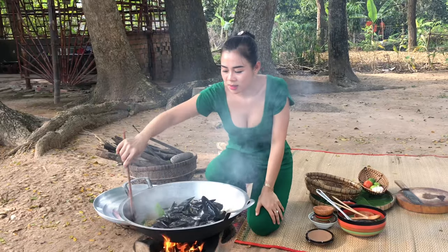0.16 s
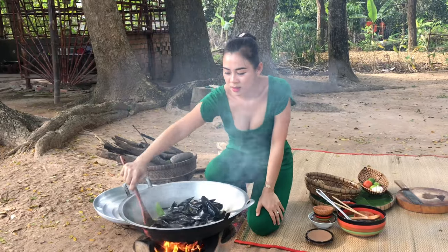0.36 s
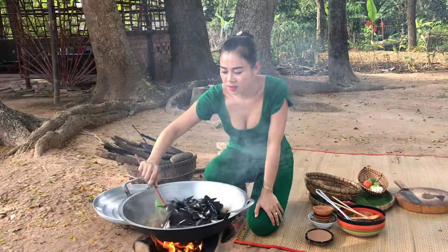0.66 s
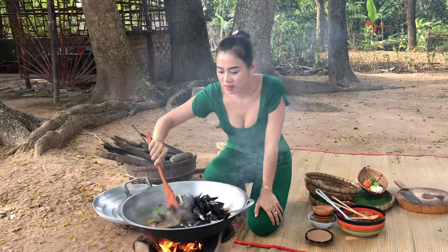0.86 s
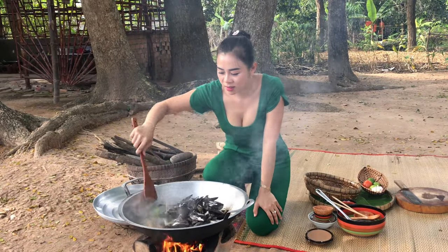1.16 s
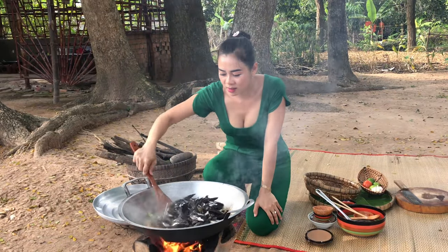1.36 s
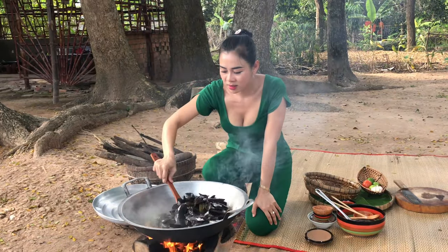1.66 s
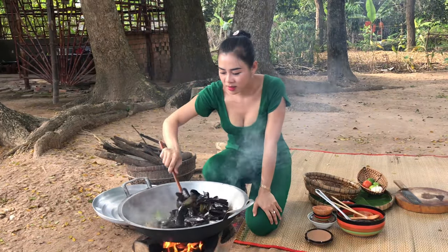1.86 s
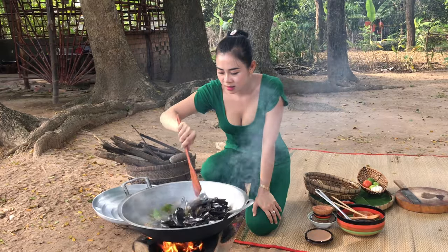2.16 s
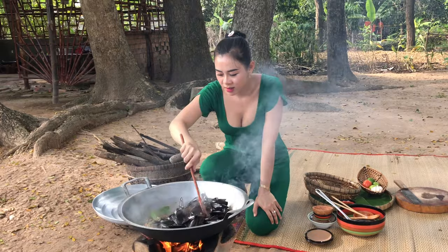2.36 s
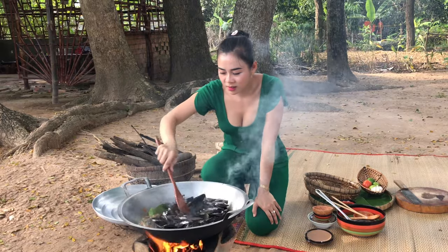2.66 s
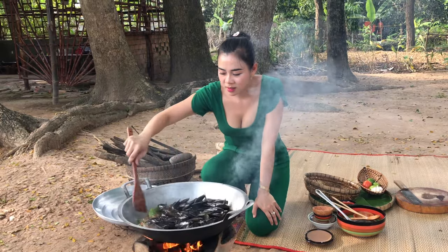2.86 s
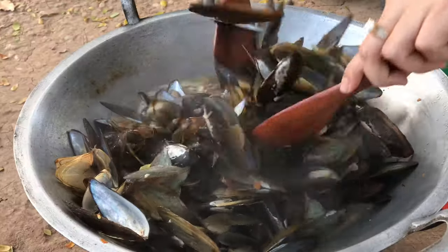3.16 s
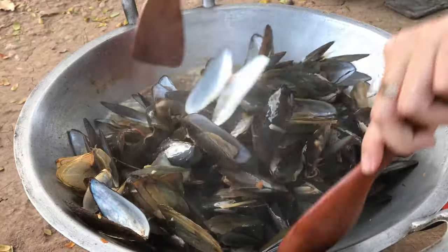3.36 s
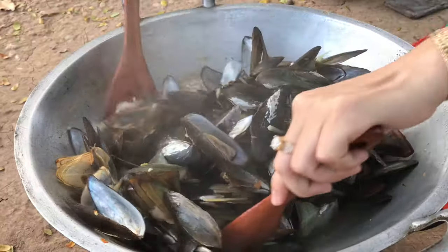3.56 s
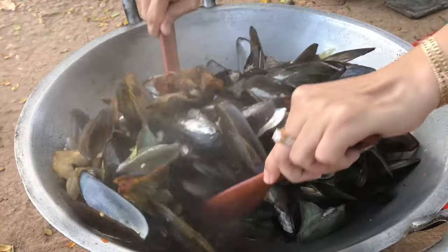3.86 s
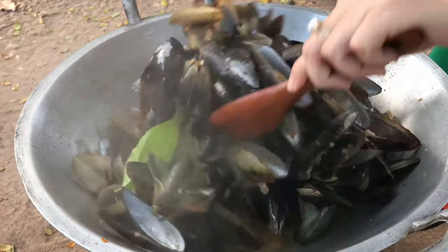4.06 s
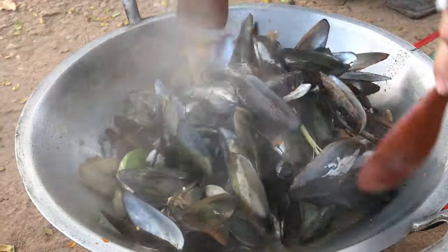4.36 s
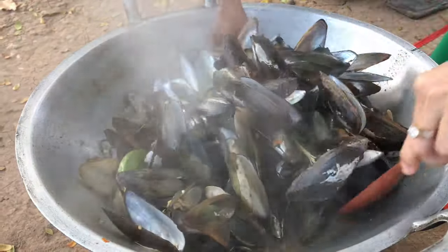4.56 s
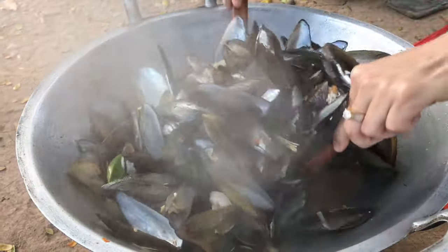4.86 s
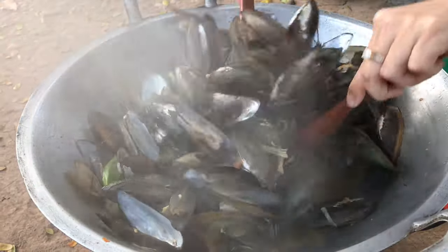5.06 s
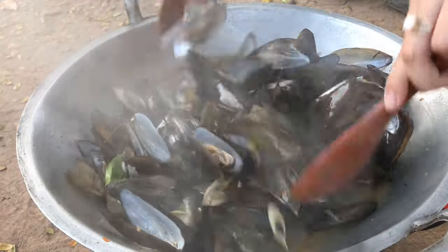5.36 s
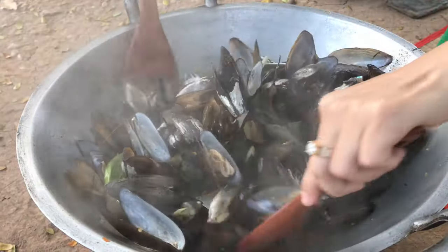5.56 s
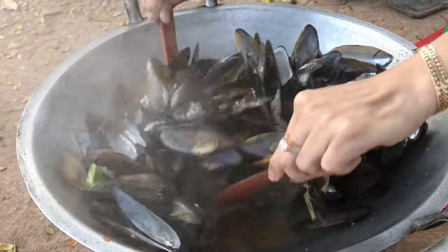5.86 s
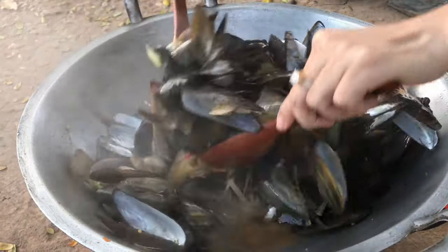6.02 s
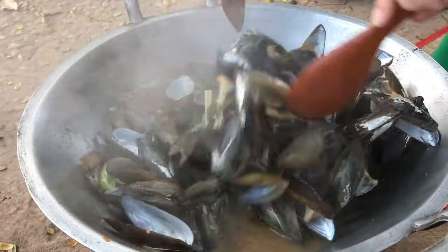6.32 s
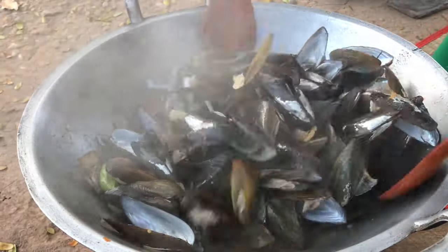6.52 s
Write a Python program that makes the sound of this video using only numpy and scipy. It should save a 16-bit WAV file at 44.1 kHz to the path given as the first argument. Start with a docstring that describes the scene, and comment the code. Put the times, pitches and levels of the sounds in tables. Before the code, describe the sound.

From 0 to 3 seconds the wok is some steps away outdoors and everything is quiet: a low wavering engine drone with soft airy hiss and a thin simmering hum, faint shell grinding in slow strokes, small clacks and light metallic knocks at about 0.25 and 1.3 s. At 3.0 s sound drops out for a few hundredths of a second, then returns far louder, right at the microphone. Mussel shells clatter crisply at 3.1-3.5 s, with wok knocks. Spatula pushes follow two or three a second, scraping shells, sloshing thick bubbly broth and raising bright fizz. Wet thuds land around 3.6-4.1 and 5.1-5.8 s; sharp clacks stand out near 4.5 and 4.9 s, then a dense tumble at 5.2-5.7 s. From 6 to 6.7 s the clacks are strongest, ending with a bright wok knock at 6.6 s. Engine hum and low rumble continue behind.

```python
"""Shells clack and grind, faint at first: mussels turned with wooden spatulas in a wok of broth, outdoors.
For three seconds the wok is some steps away; after a brief silence it is right at the microphone.
Shells and metal are dying modes; scrapes, sloshing broth and fizz are crowds of tiny grains.
Knocks ring the wok, wet thuds sound in the heap, and behind them an engine drones as wavering tones."""
import sys
import numpy as np
from scipy import signal
from scipy.fft import rfft, irfft
from scipy.io import wavfile
from scipy.ndimage import uniform_filter1d

SR = 44100
rng = np.random.default_rng(int(sys.argv[2]) if len(sys.argv) > 2 else 0)


def generate_wav(sig):
    """Save sig (samples, or channels by samples) to the path in sys.argv[1] as 16-bit PCM at SR."""
    pcm = np.round(np.clip(np.atleast_2d(sig).T, -1, 1) * 32767).astype(np.int16)
    wavfile.write(sys.argv[1], SR, pcm)


N = 295029
TIME = np.arange(N) / SR

CUT_OUT, CUT_IN = 3.014, 3.048  # s, the silent gap between the distant and the close position
REST_GRIND_DB, REST_SLOSH_DB, REST_FIZZ_DB = -45.5, -44.5, -53.5  # close up, between pushes

# the wok's ringing modes: mode_hz, level_db, t60_s
WOK = [(353, -7.5, 0.12), (468, -17, 0.18), (700.5, -8.5, 0.11), (798, -10, 0.27), (920, -26, 0.065),
       (1070, -3, 0.11), (1270, -0.5, 0.094), (1360, -6, 0.14), (1670, -23, 0.21), (1740, 0, 0.1),
       (1890, 4, 0.043), (2086, 5, 0.053), (2387, 2, 0.097), (2513, 2.5, 0.099), (2600, 4.5, 0.1),
       (2810, 8.5, 0.076), (3080, 5, 0.064), (3470, -14, 0.073), (4030, 8.5, 0.027), (4290, 1, 0.074),
       (4320, -30, 0.091), (5690, 2, .07), (6600, -11, .04)]
# colour of shells grinding, also of the crack of a knock: frequency_hz, density_db (per Hz)
GRIND = [(400, -31.5), (900, -6), (1500, -6.5), (2400, 0), (3300, -0.5), (4500, -4.5), (5200, -10.5),
         (6300, -5), (9000, -16), (16000, -24)]


def clacks(rows, second_db=-4, side_db=-5.0, side_octaves=0.58, edge_t60=0.015, edge_db=-1.5, ring_share=0.64):
    """Each shell rings in two strong modes among a crowd of weak ones; its hard edge adds a bright tick."""
    # a shell's bright tick: frequency_hz, density_db (per Hz)
    edge_colour = [(3000, -38), (6000, 3.5), (8200, 7), (10200, -1), (12000, 2), (15500, -3)]
    second_ratio, second_octaves = 1.603, 0.15  # second mode over the first, and its scatter
    out, t = np.zeros(N), np.arange(1800) / SR
    hz = np.fft.rfftfreq(len(t), 1 / SR) + 1
    contact = 1 - np.exp(-t / .0004)  # the wet contact lasts a moment
    for s, db, main_hz, sharp_db, t60 in rows:
        second_hz = main_hz * second_ratio * 2 ** (second_octaves * rng.standard_normal())
        phases = np.exp(2j * np.pi * rng.random((2, len(hz))))
        octaves_away = np.log2(hz / main_hz)
        crowd = irfft(phases[0] * np.exp(-.5 * (octaves_away / side_octaves) ** 2))
        crowd = struck(crowd * amp(-60 * t / t60))
        modes = struck(ring([main_hz, second_hz], [0, second_db], t60 * ring_share, t))
        body = (modes + amp(side_db) * crowd) * contact
        snap = amp(-60 * t / edge_t60) + amp(-0.5 - 60 * t / 0.0023)  # a short sizzle and a sharper snap
        edge = irfft(phases[1] * amp(read(edge_colour, hz))) * snap
        add(out, s, amp(db) * (struck(body) + amp(sharp_db + edge_db) * struck(edge)))
    return out


def loose_shells(grind):
    """Small clacks at random moments, as strong as the push that tumbles them; rows for clacks()."""
    per_s, over_grind_db, spread_db = 42, 2.5, 2
    centre_hz, octaves, edge_db, t60_s = 3004, 0.422, -6.5, .015
    count = int(per_s * N / SR)
    chance = rng.random((400, 4))[:count]
    at = (chance[:, 0] * N).astype(int)
    size, pitch, edge = np.sqrt(12) * (chance[:, 1:].T - .5)  # uniform, rms 1
    db = 20 * np.log10(grind[at] + 1e-9) + over_grind_db + spread_db * size
    main_hz = centre_hz * 2 ** (octaves * pitch)
    return [(*row, t60_s) for row in zip(at / SR, db, main_hz, edge_db + 4 * edge)]


def near_stirring(grind, slosh):
    """Close up, shells scrape and tick and broth sloshes under the strokes, with a floor between them."""
    grind = np.hypot(grind, amp(REST_GRIND_DB))
    slosh = np.hypot(slosh, amp(REST_SLOSH_DB))
    scrape = amp(-3.5) * grind * shell_grains(per_s=1800, spread_db=4.5, t60=0.011, count=30)
    ticks = amp(-4) * grind * shell_grains(per_s=200, spread_db=4.8, t60=0.0073)
    liquid = amp(-1.5) * slosh * broth(per_s=1000, spread_db=3.3, cycles=15.3, rise=0.085)
    return lifted() * (scrape + ticks + liquid)


def shell_grains(per_s, spread_db, t60, count=36):
    """Shell edges catch and slip: tiny ticks, each with three short modes."""
    t = np.arange(800) / SR
    shells = []
    for hz in np.geomspace(950, 6200, count):
        modes_hz = hz * rng.uniform([1, 1.3, 2], [1.1, 1.9, 2.9])
        grain_t60 = t60 * rng.uniform(0.74, 1.35) * (hz / 2500) ** -.5  # higher shells die sooner
        shells.append(ring(modes_hz, [0, -2, -4], grain_t60, t))
    return scatter(shells, per_s, spread_db, GRIND)


def broth(per_s, spread_db, cycles, rise, count=32):
    """Bubbles and squelches: about a dozen dying cycles each, rising in pitch as they surface."""
    # frequency_hz, density_db (per Hz)
    slosh_colour = [(100, -8.5), (200, -2), (350, 1.5), (600, 3), (1100, 5), (1700, 8), (3000, -15.5)]
    t = np.arange(2600) / SR
    bubbles = []
    for hz in np.geomspace(190, 2000, count):
        age = t * hz / (cycles * rng.uniform(0.59, 1.1))  # 1 when the bubble is 60 dB down
        turns = hz * t * (1 + rise * np.minimum(age, 1))
        bubbles.append(amp(-60 * age) * np.sin(2 * np.pi * turns))
    return scatter(bubbles, per_s, spread_db, slosh_colour)


def fizz(per_s, spread_db, count=28):
    """Droplets and films of broth burst on shells and hot metal; their tiny pings merge into a hiss."""
    # frequency_hz, density_db (per Hz)
    fizz_colour = [(2000, -24), (5000, -1.5), (7000, -3.5), (9000, 0.5), (10200, -3.5), (11500, -0.5),
                   (15500, -3.5)]
    t = np.arange(200) / SR
    pings = [ring([hz, hz * rng.uniform(.6, 1.3)], [0, 0], .0025, t)
             for hz in np.geomspace(4000, 16000, count)]
    return scatter(pings, per_s, spread_db, fizz_colour)


def knocks(crack_db=-3, crack_t60=0.027):
    """Spatula or shell hits the wok: a short crack, then the metal rings, damped by its load."""
    # start_s, level_db (before the 0.7 gain below), tilt_db (per octave), sustain (times the wok's own t60)
    knock_rows = [(0.251, -50.5, -4.5, 1.6), (0.396, -55, -5, 1.1), (0.446, -60, -5, 1.1),
                  (1.274, -44, -3.5, 1.7), (3.104, -25, -2, .9), (3.482, -27, -1, .8),
                  (3.5318, -33.5, -10, 1.1), (4.533, -25, -3.5, 1.1), (4.893, -36, -10, 1.1),
                  (5.552, -29.5, -4, 1.1), (6.581, -21.5, 0.5, .9)]
    out, t = np.zeros(N), np.arange(SR // 2) / SR
    hz, mode_db, t60 = np.transpose(WOK)
    for s, db, tilt_db, sustain in knock_rows:
        tilted_db = mode_db + tilt_db * np.log2(hz / 2000)
        metal = struck(ring(hz, tilted_db, t60 * sustain, t), size=660)
        crack = colour(rng.standard_normal(len(t)), GRIND) * amp(-60 * t / crack_t60)
        add(out, s, amp(db) * (metal + amp(crack_db) * struck(crack, size=660)) * 0.7)
    return out


def thuds(splash_db=-2, splash_octaves=0.94):
    """Wood meets the wet heap: a pocket of broth rings briefly inside a dull splash."""
    # start_s, level_db (2 dB above what sounds), pitch_hz, t60_s (scaled below for pocket and splash)
    thud_rows = [(0.803, -55, 738, 0.045), (1.802, -54.5, 820, .055), (2.223, -53, 710, .034),
                 (2.755, -41.5, 1200, 0.0073), (3.103, -33, 405, 0.027), (3.641, -31, 436, .023),
                 (3.693, -32.5, 720, 0.019), (3.827, -33, 930, .021), (3.857, -30, 525, .026),
                 (4.145, -29, 1050, .025), (4.536, -33, 325, .068), (5.135, -29, 470, 0.025),
                 (5.198, -28.5, 1240, 0.025), (5.262, -28, 1060, 0.037), (5.423, -24, 1090, 0.02),
                 (5.559, -33, 318, .055), (5.739, -32, 334, .028), (5.759, -29.5, 1070, 0.012),
                 (5.807, -34, 435, 0.033)]
    out, t = np.zeros(N), np.arange(4000) / SR
    f = np.fft.rfftfreq(len(t), 1 / SR) + 1
    for s, db, hz, t60 in thud_rows:
        pocket = ring(hz, 0, t60 * 0.77, t)
        band = -.5 * (np.log2(f / hz) / splash_octaves) ** 2
        splash = irfft(np.exp(2j * np.pi * rng.random(len(f)) + band)) * amp(-60 * t / (t60 * 1.75))
        soft_onset = 1 - np.exp(-t / 0.00089)
        thud = (struck(pocket) + amp(splash_db) * struck(splash)) * soft_onset
        add(out, s, amp(db - 2.0) * struck(thud, size=300))
    return out


def push(start, length, settle_s):
    """Gain of one stroke: a quick bite, an arched hold, then the heap settles."""
    bite_s, arch_db = 0.014, 3  # strongest in its middle
    t = np.maximum(TIME - start, 0)
    arch = (2 * np.minimum(t / length, 1) - 1) ** 2
    settling_db = 60 * np.maximum(t - length, 0) / settle_s
    return (1 - np.exp(-t / bite_s)) * amp(-arch_db * arch - settling_db)


def strokes():
    """How hard the shells grind, the broth sloshes and the spray fizzes at every sample, as gains."""
    # pushes of the spatula through the heap: start_s, length_s, grind_db, slosh_db, fizz_db
    push_rows = [(0, 0.14, -58.5, -65, -74), (.38, 0.062, -61, -58, -73), (.85, .2, -64, -70, -76),
                 (1.422, 0.097, -64, -62, -74), (1.715, 0.53, -61.5, -66, -77),
                 (2.45, 0.36, -60, -68, -76.5), (3.056, 0.13, -37, -43, -47),
                 (3.259, 0.12, -33, -45.5, -50), (3.49, 0.069, -43.5, -44, -57),
                 (3.659, 0.26, -39, -40, -48), (4.02, 0.34, -34.5, -43, -44.5),
                 (4.512, .035, -33, -36.5, -45), (4.639, 0.07, -32.5, -39.5, -46),
                 (4.742, 0.075, -35, -38.5, -47), (4.852, 0.11, -37.5, -39, -62),
                 (5.162, .24, -32.5, -43.5, -48), (5.517, 0.069, -35.5, -45, -46),
                 (5.632, 0.13, -36.5, -43.5, -49), (5.797, 0.17, -35, -44.5, -45.5),
                 (6.045, 0.18, -33, -42, -46), (6.353, 0.16, -31, -44.5, -45),
                 (6.587, 0.087, -38, -41.5, -55)]
    shells_settle_s, broth_settle_s = 0.38, 0.42  # t60 after the push
    power = np.zeros((3, N))
    for start, length, grind_db, slosh_db, fizz_db in push_rows:
        shells, liquid = push(start, length, shells_settle_s), push(start, length, broth_settle_s)
        power += np.square([amp(grind_db) * shells, amp(slosh_db) * liquid, amp(fizz_db) * shells])
    return np.sqrt(power)


def lifted():
    """Gain that dips while the spatulas are clear of the heap."""
    # middle_s, half_length_s, depth_db
    lift_rows = [(3.453, 0.032, 16), (3.928, 0.043, 5.5), (4.44, .05, 1.5)]
    return amp(-sum(db * np.exp(-((TIME - s) / half) ** 4) for s, half, db in lift_rows))


def bowl(x, size=8000):
    """Short echo between the wok's walls: sparse random reflections, each band dying at its own rate."""
    # frequency_hz, t60_s (floored at 0.01 s below)
    echo_t60 = [(300, -0.1), (1000, 0.22), (2500, -0.02), (5000, 0.09), (12000, 0)]
    # frequency_hz, gain_db
    echo_colour = [(300, 0.5), (1200, -3), (2500, -1), (4000, -3.5), (7000, -8.5), (15000, 13)]
    taps = rng.standard_normal(size) * (rng.random(size) < .03)
    taps = taps * (np.arange(size) > .002 * SR)  # nothing returns in the first 2 ms
    hz, t, z = signal.stft(taps, SR, nperseg=128)
    t60 = np.maximum(read(echo_t60, hz), 1e-2)[:, None]
    tail = signal.istft(z * amp(-60 * t / t60), SR, nperseg=128)[1]
    return signal.oaconvolve(x, colour(tail / np.linalg.norm(tail), echo_colour))[:N]


def wok_ring(x):
    """Whatever rubs or bubbles in the wok keeps its modes ringing."""
    metal = ring(*np.transpose(WOK), np.arange(SR // 4) / SR)
    return signal.oaconvolve(x, metal / np.linalg.norm(metal))[:N]


def far_view(grind, slosh):
    """From some steps away: open air, engine, the simmer humming in the wok's metal, faint stirring."""
    # the engine's level: time_s, level_db
    drone_curve = [(0, -55.5), (.8, -57), (1.8, -53.5), (3.0, -51.5)]
    # its orders: multiple, level_db
    orders = [(1, 0), (2, -9), (3, -22), (3.66, -23)]
    # thin steady whines: pitch_hz, level_db
    whine_rows = [(400, -81), (668, -82), (945, -84), (1075, -80.5), (1595, -78), (1725, -78), (4550, -76),
                  (14130, -85)]
    # three noise colours: frequency_hz, density_db (per Hz)
    air_colour = [(88, -25), (170, -1.5), (330, -10.5), (500, -14.5), (800, -18), (1400, -9.5), (2250, -20),
                  (3400, -12.5), (4500, -18), (4900, -18), (6300, -15), (7500, -19), (9200, -12.5),
                  (10300, -20), (15600, -20.5)]
    rumble_colour = [(24, -36), (40, -8), (52, -1.5), (75, 0), (110, -3), (160, -15.5), (300, -28),
                     (600, -55)]
    simmer_colour = [(1800, -22.5), (2350, -6.5), (2650, 6.5), (2900, -2), (3300, -14), (4000, -36)]
    engine_hz = 52.4
    db, = follow(drone_curve)
    engine = sum(tone(engine_hz * k, db + order_db, waver_hz=0.28, waver_db=2.0) for k, order_db in orders)
    whines = sum(tone(f, line_db, waver_hz=f / 900, waver_db=2) for f, line_db in whine_rows)
    air = amp(-60) * hiss(air_colour) + amp(-64) * hiss(rumble_colour)
    simmer = amp(-63) * unit(wok_ring(rng.standard_normal(N)))
    simmer += amp(-64.0 + 0.73 * drift(7.4)) * hiss(simmer_colour)
    stirring = amp(-9.5) * grind * shell_grains(per_s=240, spread_db=2.5, t60=0.014)
    stirring += amp(-4) * slosh * broth(per_s=140, spread_db=5, cycles=12.0, rise=.04)
    return engine + whines + air + simmer + stirring


def near_background():
    """Behind the close wok: the engine, steady hum, and a low rumble that swells in, then holds."""
    # the engine: time_s, pitch_hz, level_db
    engine_curve = [(3.15, 69.4, -64), (3.34, 70.2, -46), (4.15, 70.5, -51), (4.45, 68.7, -54),
                    (5.4, 69.1, -47.5), (5.7, 66, -49), (6.69, 66.2, -48)]
    # hum beside it: pitch_hz, level_db (1.5 dB above what sounds)
    hum_rows = [(44, -58), (128.5, -51.5), (355.3, -58.5), (424, -60)]
    # frequency_hz, density_db (per Hz)
    rumble_colour = [(24, -53), (43, 2.5), (68, -0.5), (100, 0.5), (160, -3), (300, -16), (900, -14.5),
                     (3000, -19), (15000, -29)]
    rumble_db, start_db, swell_s = -48, -13.5, 0.64  # start_db is relative to the held level
    hz, db = follow(engine_curve)
    swell_db = start_db * np.clip(1 - (TIME - CUT_IN) / swell_s, 0, 1)
    hum = sum(tone(f, line_db + swell_db - 1.5, waver_hz=1.213, waver_db=2.0) for f, line_db in hum_rows)
    rumble = amp(rumble_db + swell_db + 2.3 * drift(3.6)) * hiss(rumble_colour)
    return tone(hz, db, waver_hz=2.05, waver_db=2.0) + hum + rumble


def tone(hz, db, waver_hz=1.0, waver_db=1.5):
    """A sine line whose pitch and level wander."""
    turns = np.cumsum(hz + waver_hz * drift(3.82)) / SR
    return np.sqrt(2) * amp(db + waver_db * drift(3.1)) * np.sin(2 * np.pi * turns)


def scatter(templates, per_s, spread_db, points, size=3000):
    """Random grains, many small and few large, coloured and held at a steady mean level."""
    happens = rng.random(N) < per_s / SR
    sizes = amp(spread_db * np.minimum(rng.exponential(1, N), 4))
    clicks = happens * rng.choice([-1, 1], N) * sizes
    which = rng.integers(0, len(templates), N)
    grains = sum(signal.oaconvolve(clicks * (which == k), unit(g))[:N] for k, g in enumerate(templates))
    out = colour(grains, points)
    power = uniform_filter1d(uniform_filter1d(out ** 2, size), size)
    return out / np.sqrt(abs(power) + 1e-12)


def ring(hz, db, t60, t):
    """A sum of dying modes, each of random sign."""
    hz, db, t60 = (np.reshape(v, (-1, 1)) for v in (hz, db, t60))
    sign = rng.choice([-1, 1], hz.shape)
    return (sign * amp(db - 60 * t / t60) * np.sin(2 * np.pi * hz * t)).sum(0)


def struck(x, size=220):
    """Scales a hit to rms 1 over its first samples."""
    return x / np.sqrt(np.mean(x[:size] ** 2) + 1e-20)


def colour(x, points, size=4096):
    """Causal (minimum-phase) filter with the given spectrum, so that clicks keep their sharp front."""
    log_gain = np.log(amp(read(points, abs(np.fft.fftfreq(size, 1 / SR)))))
    taps = np.fft.ifft(np.exp(np.conj(signal.hilbert(log_gain)))).real
    return signal.oaconvolve(x, taps)[:len(x)]


def hiss(points):
    """Coloured noise of rms 1."""
    return unit(colour(rng.standard_normal(N), points))


def drift(hz):
    """Slow random wander of rms 1, up to about hz."""
    f = np.fft.rfftfreq(N, 1 / SR)
    return unit(irfft(rfft(rng.standard_normal(N)) * np.exp(-(f / hz) ** 2), N))


def amp(db):
    """Decibels to gain."""
    return 10 ** (np.asarray(db) / 20)


def unit(x):
    """Scales to rms 1."""
    return x / np.sqrt(np.mean(x ** 2) + 1e-20)


def read(points, hz):
    """A spectrum's value on a log-frequency axis."""
    f, value = np.transpose(points)
    return np.interp(np.log(hz + 1), np.log(f + 1), value)


def follow(rows):
    """Each column of a curve at every sample."""
    s, *columns = np.transpose(rows)
    return [np.interp(TIME, s, c) for c in columns]


def add(mix, s, sound):
    """Lays a sound into the mix at time s."""
    part = mix[max(round(s * SR), 0):][:len(sound)]
    part += sound[:len(part)]


def scene():
    """Blows and fizz sound at both distances; each has its own stirring and background."""
    # loudest clacks of shell on shell: start_s, level_db, main_mode_hz, sharp_edge_db (before edge_db),
    # t60_s (of the weak modes; the strong ones die sooner)
    clack_rows = [(0.2509, -48, 3950, -16, .03), (1.2736, -40, 4370, -17, .03),
                  (2.0053, -53, 2880, -15, .028), (2.0813, -53, 2740, -16, 0.027),
                  (2.1534, -54, 1870, -16, .03), (3.0601, -24.5, 3000, -17, 0.03),
                  (3.1035, -21.5, 3290, -29, 0.022), (3.1882, -18, 2550, -5, 0.015),
                  (3.2804, -28, 3750, -4, .017), (3.3571, -21, 2510, -13, .02),
                  (3.373, -25, 4160, -4, 0.0098), (3.379, -22, 3270, -5, 0.013),
                  (3.4146, -28.5, 3250, -15, 0.0084), (3.4813, -21.5, 4680, -4, .014),
                  (3.509, -31, 1910, -19, 0.019), (3.5315, -23.5, 3080, -39, 0.038),
                  (3.693, -31.5, 1270, -18, .019), (4.023, -28.5, 2430, -10, 0.023),
                  (4.1462, -27.5, 1295, -9, 0.018), (4.1967, -29, 3520, 3.5, 0.025),
                  (4.3192, -19, 2540, -2, 0.0067), (4.3736, -27.5, 3850, -9, .013),
                  (4.3865, -23.5, 2070, -16, 0.0087), (4.526, -15.5, 3680, -6.5, 0.017),
                  (4.5337, -19.5, 3080, -18, 0.029), (4.6847, -29, 2810, -19, 0.035),
                  (4.7527, -29.5, 2360, -13, 0.027), (4.8877, -14.5, 2800, -2.5, .026),
                  (4.903, -27.5, 2840, -8, .018), (4.9424, -30, 4050, -16, .016),
                  (5.197, -27.5, 2590, -12, 0.028), (5.223, -19, 3150, -10.5, 0.022),
                  (5.2379, -26.5, 1920, -1, 0.023), (5.2445, -22, 3270, -11, 0.023),
                  (5.2622, -25.5, 2800, 0, .02), (5.2883, -24, 2430, -19, .013),
                  (5.312, -26, 2570, -5, 0.019), (5.3425, -20.5, 3080, -10, .012),
                  (5.3487, -22.5, 3150, -16, .034), (5.3836, -27.5, 2660, -8, 0.019),
                  (5.412, -27, 3360, -13, 0.0083), (5.421, -24, 3125, -1.5, 0.035),
                  (5.5186, -27, 2540, -1.5, 0.022), (5.5465, -19, 3080, -3, 0.035),
                  (5.62, -19, 2835, -7.5, .027), (5.657, -20.5, 3950, -6, 0.0098),
                  (5.71, -23.5, 4400, -11, .015), (5.906, -26.5, 3540, -9, 0.01),
                  (6.0303, -23, 3660, -4.5, 0.021), (6.0645, -27, 1750, -17, .03),
                  (6.0976, -22, 3500, -21, .014), (6.1467, -16.5, 2820, -12.5, 0.008),
                  (6.187, -27.5, 1250, -3, 0.02), (6.2567, -27, 2220, -24, .018),
                  (6.2924, -17.5, 2370, -9, 0.0086), (6.358, -22, 2650, -11, 0.011),
                  (6.415, -18, 3510, -3.5, .017), (6.4739, -15.5, 4450, -6, 0.011),
                  (6.4882, -11.5, 2210, -13, 0.009), (6.5194, -18, 2630, -4, 0.0075),
                  (6.578, -13.5, 3730, -5.5, 0.018), (6.6388, -23.5, 3570, -6, 0.005),
                  (6.6742, -25.5, 3690, -10.5, 0.017)]
    far = np.clip((CUT_OUT - TIME) / 0.0068, 0, 1)
    near = np.clip((TIME - CUT_IN) / 0.0044, 0, 1)
    grind, slosh, spray = strokes()

    shells = clacks(clack_rows + loose_shells(grind))
    blows = knocks() + thuds()
    hits = shells + blows
    hits += amp(-14) * bowl(shells) + amp(-19) * bowl(blows) + amp(-20.5) * wok_ring(shells)

    stirring = near_stirring(grind, slosh)
    stirring = stirring + amp(-18) * bowl(stirring) + amp(-20) * wok_ring(stirring)
    spray = np.hypot(spray, near * amp(REST_FIZZ_DB))
    droplets = lifted() * spray * fizz(per_s=4000, spread_db=4.2)

    distant = far * far_view(grind, slosh)
    close = near * (stirring + near_background())
    return ((far + near) * (hits + droplets) + distant + close)[None]


def record(dry):
    """Full-scale limit, then a steep low-pass."""
    edge_hz = 16100
    taps = signal.firwin(255, edge_hz, window=("kaiser", 9), fs=SR)
    return signal.oaconvolve(np.clip(dry, -1, 1), taps[None], "same")


dry = scene()
out = record(dry)
generate_wav(out)
```